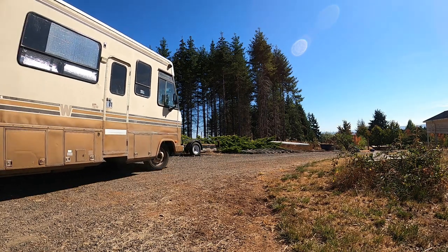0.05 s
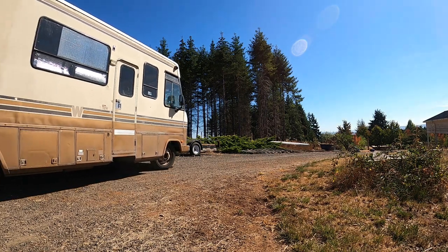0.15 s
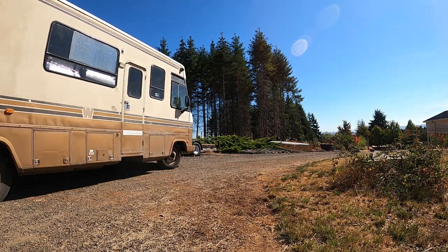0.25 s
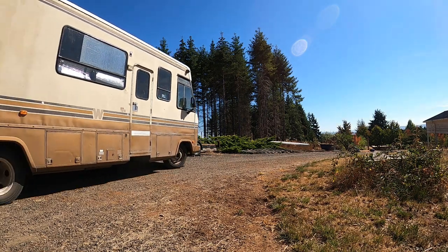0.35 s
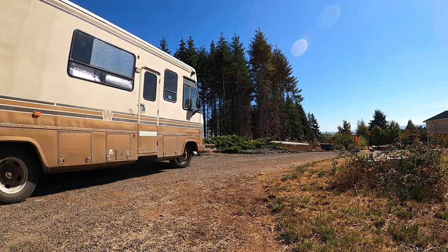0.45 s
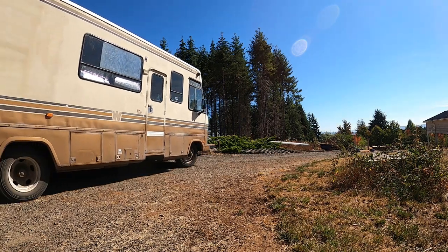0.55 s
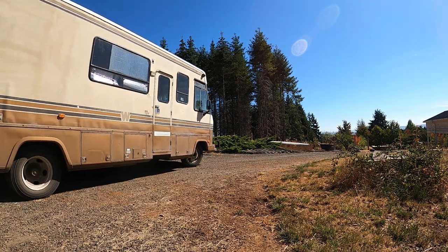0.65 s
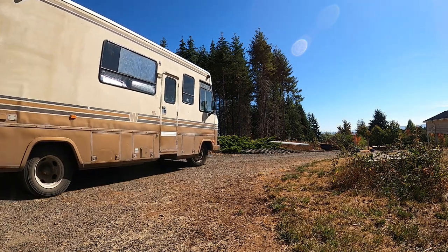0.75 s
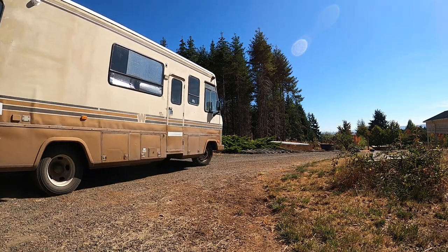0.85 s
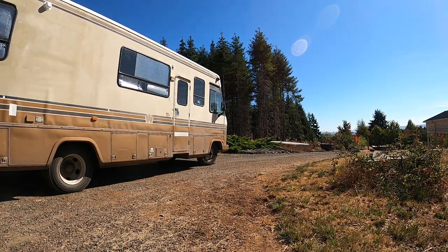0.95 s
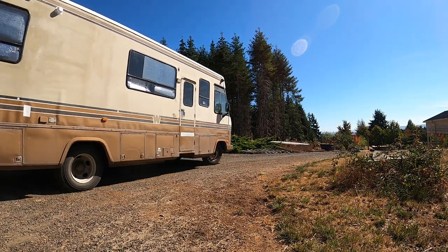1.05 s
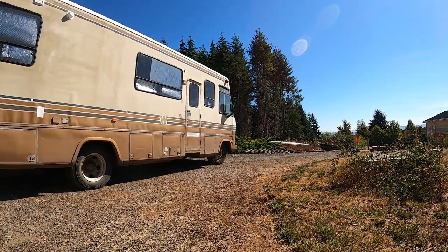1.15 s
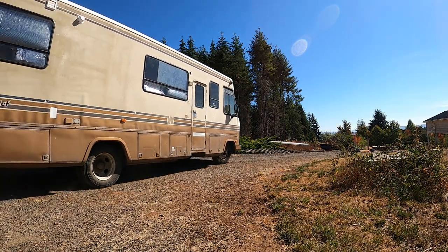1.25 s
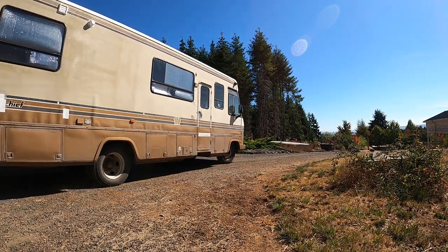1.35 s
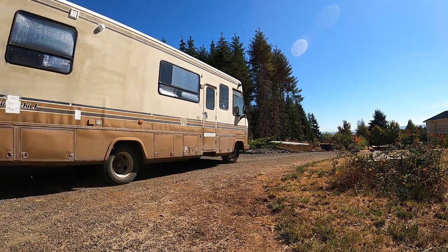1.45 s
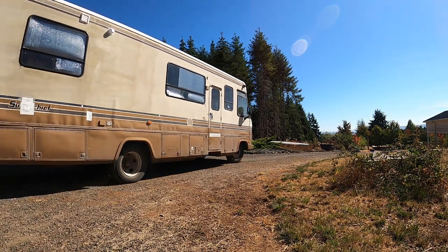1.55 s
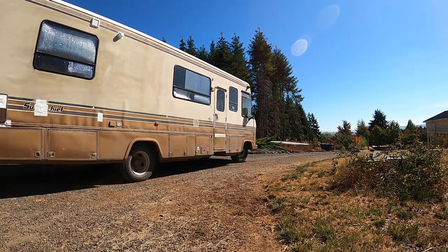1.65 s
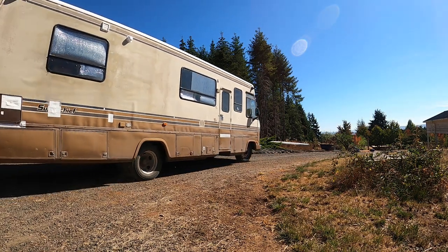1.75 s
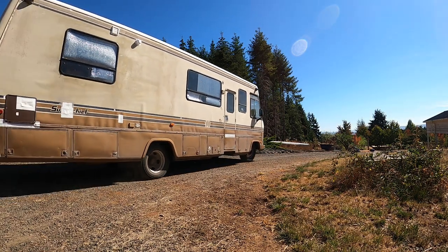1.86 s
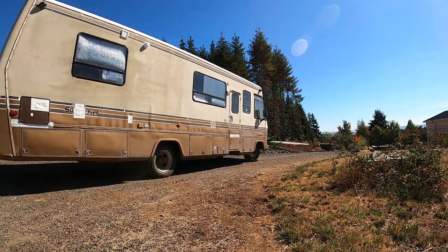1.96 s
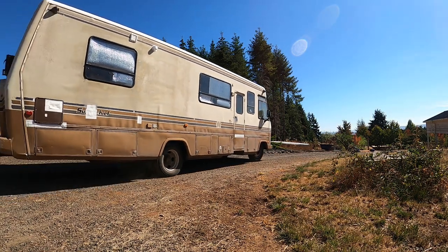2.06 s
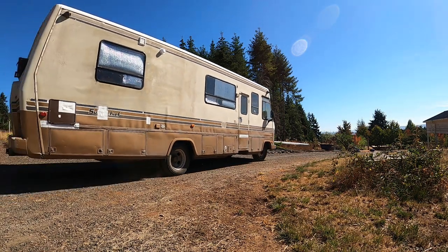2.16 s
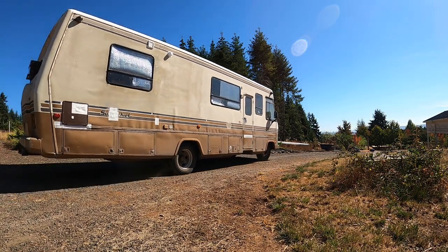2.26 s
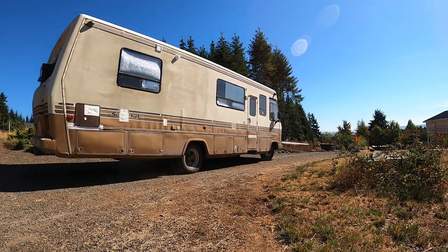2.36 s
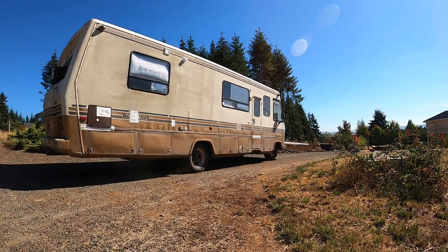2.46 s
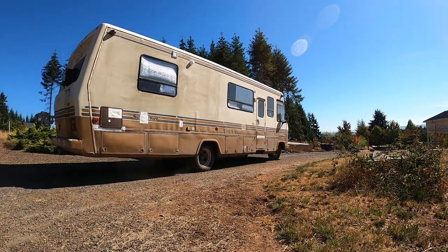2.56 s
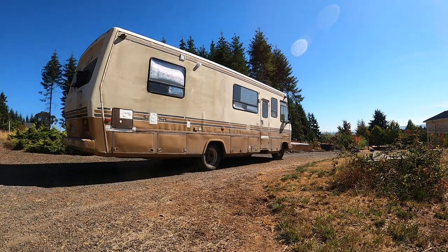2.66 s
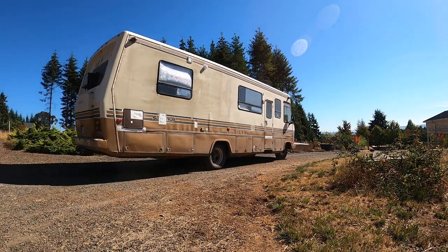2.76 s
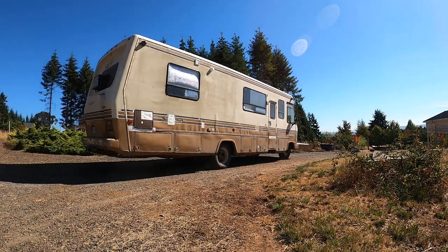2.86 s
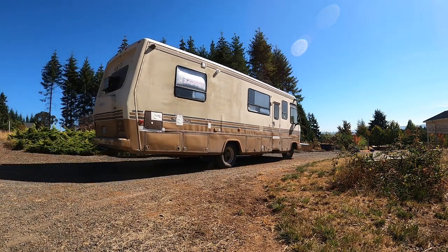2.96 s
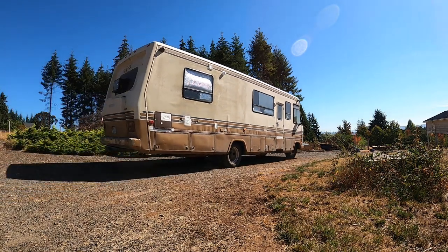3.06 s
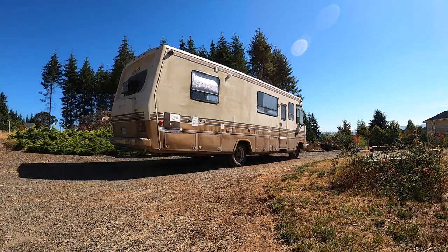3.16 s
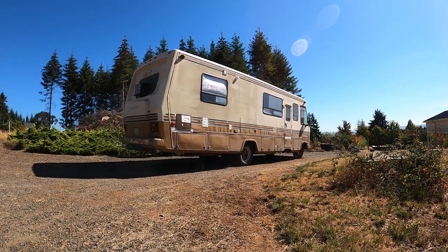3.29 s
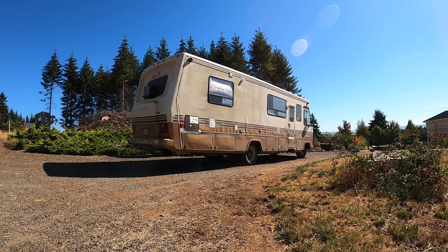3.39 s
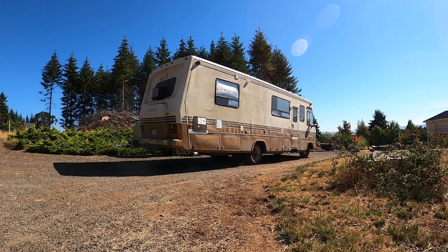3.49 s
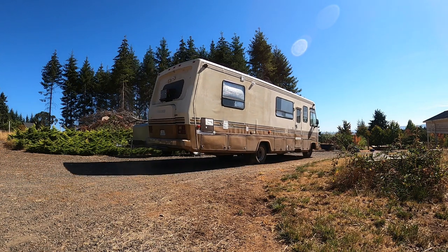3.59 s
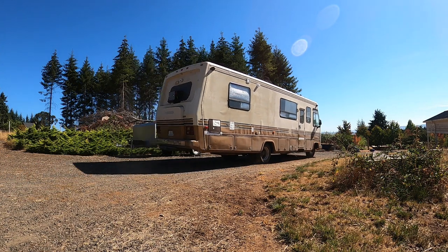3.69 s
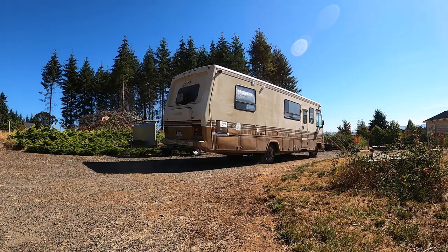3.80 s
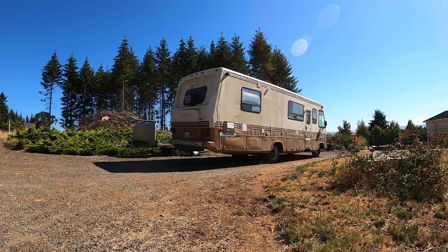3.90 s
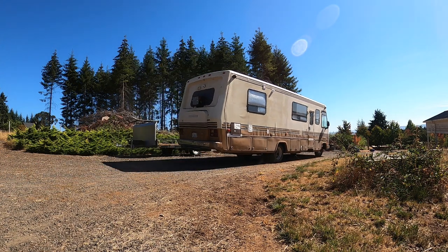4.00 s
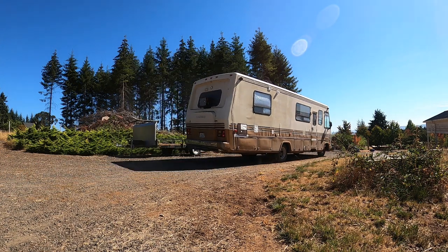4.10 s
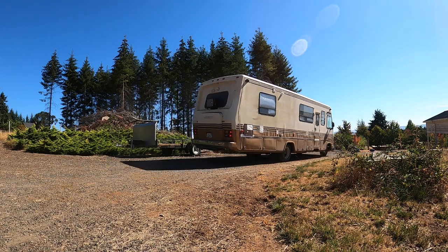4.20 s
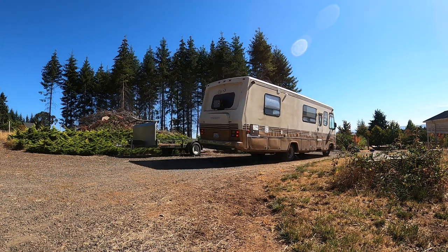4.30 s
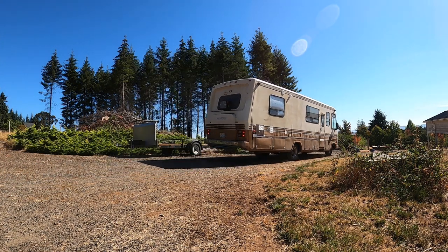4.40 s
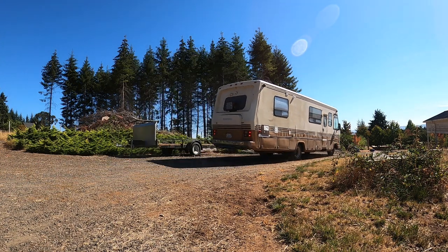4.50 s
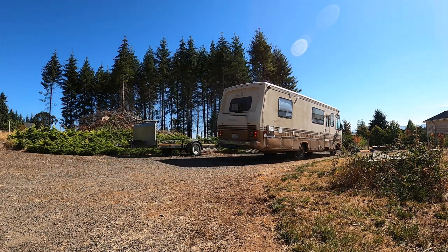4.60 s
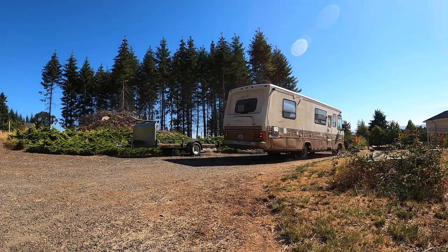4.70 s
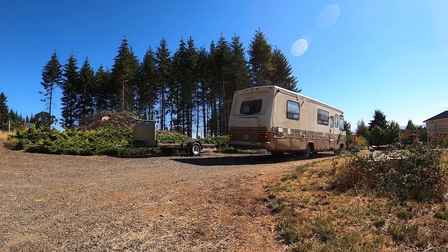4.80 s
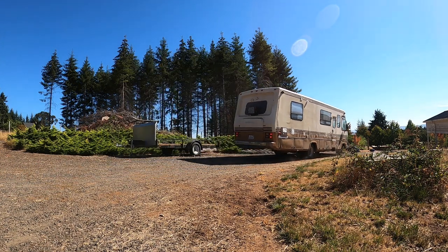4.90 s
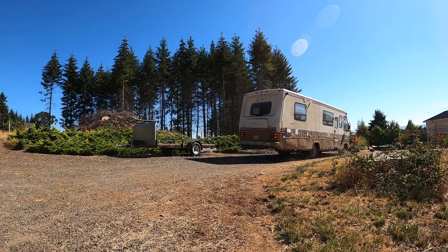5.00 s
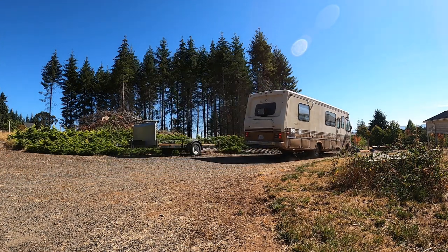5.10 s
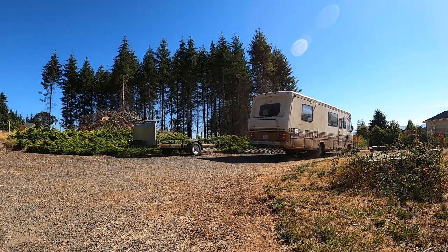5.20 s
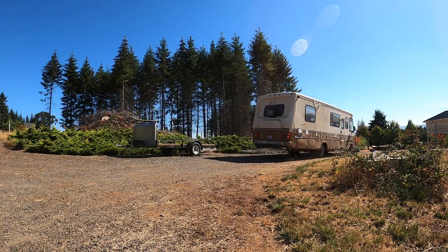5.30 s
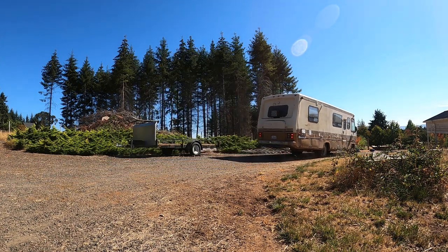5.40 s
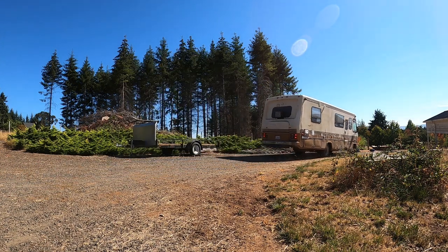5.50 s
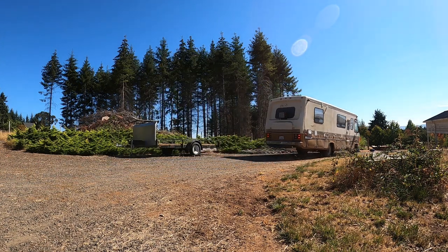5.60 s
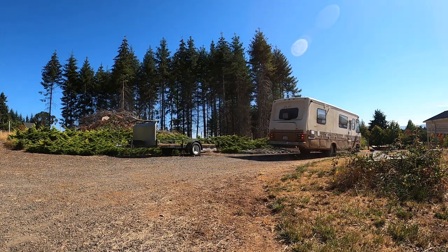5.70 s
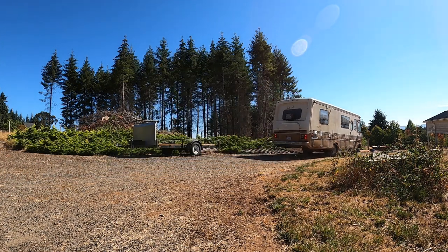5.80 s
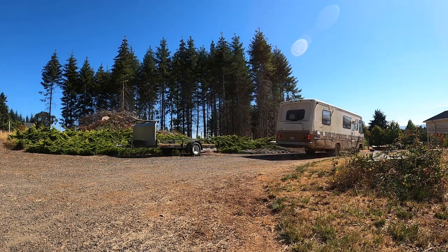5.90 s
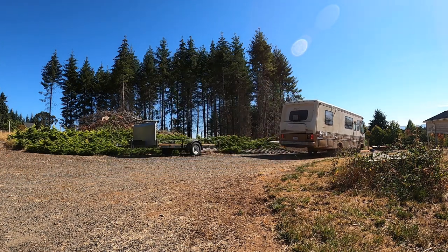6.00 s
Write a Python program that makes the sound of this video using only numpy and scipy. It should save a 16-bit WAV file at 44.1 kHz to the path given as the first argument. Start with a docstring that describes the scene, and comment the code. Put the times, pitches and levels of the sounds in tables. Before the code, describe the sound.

Gravel crackles and single stones pop under the tyres of a motorhome, close and to the left at first. Beneath this, a large engine rumbles with a low, uneven pulse and a steady hum. As the vehicle moves off through the open air toward the centre, the engine softens and the pops thin out. Low gusts of wind thump on the microphone, then settle, leaving a faint rumble and crunch.

```python
"""Motorhome rolling away over gravel

A heavy motorhome idles off in the open air, from the left to just right of centre, fading as it goes.
Its V8 throbs at a hunting idle and puffs through the exhaust pipe, while a steadier motor hums on board.
Stones crunch, pop and snap under the tyres, and gusts buffet the two microphone ports."""
import sys
import numpy as np
from scipy import signal
from scipy.fft import rfft, irfft, next_fast_len
from scipy.io import wavfile
from scipy.ndimage import uniform_filter1d

SR = 44100
rng = np.random.default_rng(int(sys.argv[2]) if len(sys.argv) > 2 else 0)


def transcribe(u):
    """Save the signal u as a 16-bit wav file named by the first command-line argument.

    u: samples, shape (n,) or (channels, n), limited to [-1, 1]; the rate is SR.
    q: integer samples, one column per channel.
    """
    v = np.clip(np.atleast_2d(u).T, -1, 1)
    q = np.round(v * 32767).astype(np.int16)
    wavfile.write(sys.argv[1], SR, q)


N = 266788


def from_db(db):
    """Decibels to gain."""
    return 10 ** (np.asarray(db) / 20)


def rms_one(x):
    """Scale to rms 1."""
    return x / np.sqrt(np.mean(x ** 2) + 1e-20)


def peak_one(x):
    """Scale to peak 1."""
    return x / np.abs(x).max()


def in_time(rows):
    """Automation curves: each column after the time, read at every sample."""
    s, *columns = np.transpose(rows)
    return [np.interp(np.arange(N) / SR, s, column) for column in columns]


def at_hz(points, hz):
    """Read a spectrum on a log-frequency axis."""
    points_hz, values = np.transpose(points)
    return np.interp(np.log(hz), np.log(points_hz), values)


def envelope(s, hold_s, rise_s, fall_s):
    """Rise to 1 at time s, hold, fall."""
    corners_s = np.cumsum([s - rise_s, rise_s, hold_s + 1e-4, fall_s])
    return np.interp(np.arange(N) / SR, corners_s, [0, 1, 1, 0])


def drift(rate_hz):
    """Smooth random modulation of rms 1, changing about rate_hz times a second."""
    hop = 40
    pole = np.exp(-2 * np.pi * rate_hz * hop / SR)
    slow = signal.lfilter([1], [1, -2 * pole, pole * pole], rng.standard_normal(N // hop + 2002))[2000:]
    return np.interp(np.arange(N) / hop, np.arange(len(slow)), rms_one(slow))


def coloured(spectrum, channels=1):
    """Noise with the given spectrum, rms 1."""
    size = next_fast_len(N)
    hz = np.maximum(np.arange(size // 2 + 1) * SR / size, 1)
    gain = from_db(at_hz(spectrum, hz)) * (hz > 8)
    white = rng.standard_normal((channels, size))
    return rms_one(irfft(rfft(white) * gain, size)[:, :N])


def band(x, low_hz, high_hz):
    """Butterworth band-pass."""
    return signal.sosfilt(signal.butter(2, [low_hz, high_hz], "band", fs=SR, output="sos"), x)


def delayed(x, lag_ms):
    """Delay by a steady or moving lag."""
    return np.interp(np.arange(N) - lag_ms * SR / 1000, np.arange(N), x)


def orders(turns, levels):
    """Sines on multiples of a running phase, from (multiple, rms level/dB) pairs."""
    return sum(np.sqrt(2) * from_db(db) * np.sin(2 * np.pi * k * turns) for k, db in levels)


def add_knock(out, s, peak_db, hz, cycles, swell):
    """Mix in a sine burst; its attack (swell) and its 60 dB decay (cycles) are counted in periods."""
    turns = np.arange(int(2 * cycles * SR / hz)) * hz / SR
    attack = (1 - np.exp(-turns / swell)) ** 2
    knock = np.sin(2 * np.pi * turns) * attack * from_db(-60 * turns / cycles)
    start = round(s * SR)
    out[start:start + len(knock)] += from_db(peak_db) * peak_one(knock)[:N - start]


def cracks(per_s, spread_db):
    """Clicks at random moments, most small, a few large; rms 1."""
    sizes = from_db(spread_db * np.minimum(rng.exponential(1, N), 4)) * rng.choice([-1, 1], N)
    return rms_one((rng.random(N) < per_s / SR) * sizes)


def bursts(count, decay_s):
    """Rows of noise that open with a crack and die away with a time constant near decay_s."""
    decays_s = decay_s * from_db(rng.normal(0, 1.6, (count, 1)))
    noise = rng.standard_normal((count, SR // 40))
    noise[:, 0] = 7.0
    return noise * np.exp(-np.arange(SR // 40) / SR / decays_s)


def wind():
    """Gusts hit each microphone port with a lumpy low buffet, a flutter above it and single thumps."""
    # gusts: t/s, hold/s, buffet/dB, flutter/dB, left over right/dB
    gusts = [(0.961, 0.023, -28, -55, 0), (2.202, .25, -49, -53, 0), (2.8, .42, -27, -51, 0),
             (3.343, 0.55, -23, -37.5, -2), (3.995, 0.096, -27.5, -38, -9), (4.17, 0.31, -19.5, -33.5, 0),
             (4.584, 0.086, -19.5, -32.5, 2), (4.724, 0.23, -20.5, -36.5, 5), (5.058, 0.15, -19, -32, 2.5),
             (5.345, 0.029, -32, -54, -7), (5.661, 0.14, -48, -44, 4)]
    # buffet spectrum: f/Hz, density/dB
    buffet_spectrum = [(12, -2.5), (43, 19.5), (100, 10), (160, 6.5), (260, -42.5), (500, -66), (900, -120)]
    # thumps of air: t/s, left peak/dB, right peak/dB
    thumps = [(3.365, -26, -14), (4.170, -15.5, -27), (4.213, -9, -26), (4.243, -17, -9), (4.329, -8, -34),
              (4.35, -3, -9), (4.391, -18, -14), (4.419, -11, -20), (4.448, -12, -12.5), (4.652, -19, -24),
              (4.871, -9, -31), (4.903, -16, -24), (4.937, -10, -24), (5.066, -7, -26), (5.154, -14, -24)]
    calm_buffet_db, calm_flutter_db = -41.5, -58
    shapes = np.array([envelope(s, hold_s, rise_s=0.047, fall_s=0.083) for s, hold_s, *_ in gusts])
    *_, buffet_db, flutter_db, pan_db = np.transpose(gusts)
    sides_db = np.outer([.5, -.5], pan_db)
    buffet_gain = from_db(calm_buffet_db) + from_db(buffet_db + sides_db) @ shapes
    flutter_gain = from_db(calm_flutter_db) + from_db(flutter_db + sides_db) @ shapes
    lumps = from_db(3.9 * np.array([drift(15.0), drift(28.0)]))
    air = rng.standard_normal((2, N)) + 1.1 * rng.standard_normal(N)   # partly common to both ports
    flutter = rms_one(band(band(air, 130, 264), 110, 300) * lumps ** 1.316)
    buffet = rms_one(coloured(buffet_spectrum, channels=2) * lumps)
    out = buffet_gain * buffet + flutter_gain * flutter
    for s, left_db, right_db in thumps:
        add_knock(out[0], s, left_db, hz=98, cycles=3.22, swell=0.58)
        add_knock(out[1], s, right_db, hz=115, cycles=1.7, swell=0.66)
    return out


def motor():
    """The motor on board hums at a near-steady speed, each order wavering in level."""
    # hum: t/s, speed/Hz, second order/dB, third order/dB, upper orders/dB
    hum = [(0, 34.24, -20.5, -34, -30), (.8, 34.06, -25, -32, -41.5), (1.6, 33.97, -23, -32.5, -42.5),
           (2.4, 34.05, -24.5, -25, -38.5), (3.2, 34.15, -32.5, -32.5, -41), (3.6, 34.05, -29, -28.5, -42),
           (4.2, 33.84, -31.5, -26.5, -41.5), (4.8, 34.07, -23.5, -42, -53.5),
           (5.4, 34.21, -38, -35, -52.5), (6.05, 33.7, -46, -32.5, -55.5)]
    # overtones: multiple of the speed, level/dB re upper orders
    overtones = [(4, -6.5), (6, -3.5), (9, -7.5), (10, -10), (12, -11), (13, -7)]
    # eighth order: t/s, level/dB
    eighth = [(0, -48.5), (3.3, -55), (3.45, -40), (3.8, -43.5), (4.1, -45), (4.3, -53), (6.05, -54)]
    speed_hz, second_db, third_db, upper_db = in_time(hum)
    turns = np.cumsum(speed_hz) / SR
    upper = [(k, upper_db + db + 4.0 * drift(0.99)) for k, db in overtones]
    leading = [(2, second_db + .5 * drift(1.4)),
               (3, third_db + 2.0 * drift(8.1)),
               (8, in_time(eighth)[0] + 3.0 * drift(2.8))]
    return orders(turns, leading + upper)


def rolling():
    """Levels in dB of big stones, small stones and grit as the tyres roll and crush heaps of gravel."""
    # steady roll: t/s, big stones/dB, small stones/dB, grit/dB
    roll = [(0, -25, -32.5, -48), (.4, -27.5, -34, -49), (.88, -29, -35.5, -52.5), (1.12, -29, -34, -47),
            (2.1, -32, -34.5, -52), (2.6, -29, -34, -53), (3.0, -30.5, -34.5, -54), (3.3, -34, -37, -55.5),
            (3.6, -31.5, -36, -55.5), (3.85, -35.5, -40, -57.5), (4.5, -35, -39.5, -51.5),
            (4.66, -40, -42, -57), (4.75, -35, -38.5, -53), (4.9, -37, -40, -54), (5.15, -42, -44, -56),
            (6.05, -44.5, -45.5, -57)]
    # crushed heaps: t/s, change in big stones/dB, change in small stones and grit/dB
    crushes = [(.07, 3.5, 1), (.47, -2, 3), (.8, -1, 5.5), (.93, 3.5, 0), (1.27, 2, 2), (1.369, 4.5, -2),
               (1.94, 0, 4), (2.43, 4, 1.5), (2.5, -0.5, 2), (2.7, -4, -2), (2.79, 0.5, 5.5), (2.85, 1, 3),
               (3.408, 3.5, 5), (3.49, 0.5, -1.5), (3.61, 1.5, -0.5), (3.89, 5, 3), (4.25, 3.5, 3.5),
               (4.31, 0.5, 2), (4.47, 7.5, -3), (4.75, -3, -1.5), (4.92, 5.5, -3), (5.73, 9, 4)]
    big_db, small_db, grit_db = in_time(roll)
    shapes = np.array([envelope(s, hold_s=0, rise_s=0.01, fall_s=0.053) for s, *_ in crushes])
    big_change_db, fine_change_db = np.array(crushes)[:, 1:].T @ shapes
    return big_db + big_change_db, small_db + fine_change_db, grit_db + fine_change_db


def crunch(low_db, high_db):
    """Stones crack in clumps over a rolling hiss; low_db and high_db shade the lows and upper mids."""
    # gravel spectrum: f/Hz, density/dB
    gravel_spectrum = [(250, 5.5), (400, 8), (520, 4.5), (720, 5.5), (1100, 8), (1600, -8.5), (2800, -16),
                       (4500, -24.5), (5500, -28.5), (6500, -22.5), (7700, -24), (9000, -47), (11000, -49),
                       (13500, -33.5)]
    # stereo likeness: f/Hz, correlation of left and right
    likeness = [(300, 0.99), (1000, 0.93), (3000, 0.87), (6000, 0.82), (9000, 0.91), (11000, 0.76)]
    hiss, sharpness = 0.62, 0.35
    big_db, small_db, grit_db = rolling()
    clumps = from_db(2.8 * drift(18.0))
    wide_cracks = cracks(per_s=250.0 * clumps ** 2, spread_db=10.5)   # these span the whole range
    edges_hz = 220 * 2 ** np.arange(0, 6.2, 1 / 3)   # third octaves
    crossovers_hz = [450, 1500, 2500, 5800]
    zones = np.zeros((5, 2, N))
    for k, (low_hz, high_hz) in enumerate(zip(edges_hz, edges_hz[1:])):
        hz = np.sqrt(low_hz * high_hz)
        if k % 3 == 0:   # most cracks reach across one octave
            grains = cracks(per_s=2500.0 * (hz / 2000) ** .7 * clumps, spread_db=4.5)
            grains += sharpness * (hz / 4000) ** 0.35 * wide_cracks
            centre = rms_one(grains + hiss * rng.standard_normal(N))
            spread = rng.standard_normal(N) * clumps ** 0.72
        # alternate signs join the bands without gaps
        mid, side = band([centre, spread], low_hz, high_hz) * (-1) ** k
        alike = at_hz(likeness, hz)
        stereo = np.sqrt(1 + alike) * mid + np.sqrt(1 - alike) * side * [[1], [-1]]
        gain = from_db(at_hz(gravel_spectrum, hz) + 1.65 * drift(20.0))
        zones[np.searchsorted(crossovers_hz, hz)] += gain * stereo
    lows, low_mids, mids, high_mids, grit = zones
    big = (from_db(low_db) * lows + low_mids) / np.std(low_mids)
    small = (mids + from_db(high_db) * high_mids) / np.std(mids + high_mids)
    return from_db(big_db) * big + from_db(small_db) * small + from_db(grit_db) * rms_one(grit)


def snaps():
    """Stones snap as noise bursts with a pitched ring and two brighter bands; grit ticks in the treble."""
    # snapping stones: t/s, ring peak/dB, ring f/Hz, middle band/dB re ring, top band/dB re ring
    stone_snaps = [(0.0562, -18.5, 3040, -26, -28), (0.097, -26, 3730.0, -15, -26),
                   (0.1386, -29, 3730.0, -42, -53), (0.2102, -12.5, 3930, -9, -20),
                   (0.2742, -26, 4000, 1, -9), (0.2924, -33, 3060.0, -27, -38),
                   (0.3143, -18, 1700.0, -29, -48), (0.336, -16, 1700.0, -38, -33),
                   (0.354, -22, 4110.0, -26, -54), (0.4671, -16, 1700.0, -20, -59),
                   (0.46, -21, 4300, -12, -25), (0.5174, -23.5, 3730.0, -9, -18),
                   (0.5591, -27, 1880.0, -37, -40), (0.5708, -16, 1880.0, -9, -56),
                   (0.638, -17, 1871, -23, -46), (0.7667, -18, 1880.0, -47, -55),
                   (0.804, -18, 4110.0, -17, -31), (1.0171, -21, 3380.0, -31, -41),
                   (1.087, -22, 3380.0, -14, -30), (1.1373, -32, 4530.0, -22, -47),
                   (1.1553, -19, 4110.0, -17, -23), (1.2663, -17, 3600, -21, -50),
                   (1.2694, -15.5, 2300, -12, -56), (1.272, -19, 2400, -20, -50),
                   (1.3261, -20, 5000.0, -3, -20), (1.3599, -27, 1680, -47, -60),
                   (1.432, -23, 4110.0, -15, -37), (1.5099, -18.5, 4095, -27, -33),
                   (1.5704, -23, 4110.0, -5, -30), (1.6475, -35, 2280.0, -42, -53),
                   (1.6871, -28, 1880.0, -35, -42), (1.8173, -23, 4550, -12, -13),
                   (1.8248, -22, 5000.0, -4, -23), (1.8994, -25, 1700.0, -40, -53),
                   (2.0549, -27, 3058, -37, -50), (2.2886, -19, 4330, -22, -55),
                   (2.2925, -18, 4200, -20, -55), (2.292, -18, 2200, -36, -55),
                   (2.2984, -29, 4400, -15, -52), (2.342, -27, 4500, -15, -39),
                   (2.3516, -31, 3380.0, -24, -55), (2.4102, -20.5, 4300, -15, -41),
                   (2.4323, -11.5, 2400, -45, -53), (2.4464, -21, 3060.0, -23, -46),
                   (2.4893, -16, 4107, -20, -55), (2.5385, -19, 2078, -41, -51),
                   (2.5651, -22, 2280.0, -27, -53), (2.5965, -20.5, 2070.0, -39, -36),
                   (2.7434, -18, 2050, -37, -54), (2.7901, -34, 4500, -14, -41),
                   (2.9049, -27, 2280.0, -21, -44), (2.9244, -22, 2500, -31, -38),
                   (2.962, -18, 2501, -40, -37), (3.27, -29, 4600, -18, -41),
                   (3.3444, -18.5, 5000.0, -11, -21), (3.3943, -25, 5000.0, -12, -53),
                   (3.4116, -22, 3380.0, -26, -42), (3.461, -23, 2780.0, -33, -57),
                   (3.497, -18.5, 4110.0, -2.5, -13), (3.571, -29, 4600, -14, -42),
                   (3.634, -32, 2400, -25, -48), (3.901, -32, 1900, -30, -48), (4.113, -26, 4500, -14, -36),
                   (3.5937, -17, 1700.0, -40, -43), (4.1489, -26, 2900, -31, -49),
                   (4.2198, -29, 1700.0, -31, -50), (4.249, -22, 3060.0, -26, -56),
                   (4.3029, -24, 2100, -37, -41), (4.3724, -23.5, 3078, -34, -47),
                   (4.556, -24, 2780.0, -17, -52), (4.585, -27, 3060.0, -38, -50),
                   (4.688, -27, 2780.0, -14, -51), (5.3191, -25, 4110.0, -14, -33),
                   (5.32, -26, 1900, -40, -48), (5.555, -27, 2800, -21, -45), (5.7353, -29, 2073, -27, -59),
                   (5.9434, -23.5, 4530.0, -18, -46), (6.007, -26, 4500, -10, -40)]
    # middle and top band of a snap: low edge/Hz, high edge/Hz
    bright_bands = [(5000, 7300), (7600, 10500)]
    # grit ticks: t/s, peak/dB
    ticks = [(.1181, -41), (.1874, -44), (.377, -36), (.3994, -36), (.511, -32), (.585, -41), (.61, -42),
             (.9244, -47), (1.4433, -41), (1.6273, -31), (1.9335, -31), (1.966, -28), (2.174, -31),
             (2.4981, -28), (2.5164, -37), (2.5401, -33), (2.5865, -35), (2.6459, -29), (2.893, -32),
             (3.234, -49), (3.485, -40), (3.6371, -45)]
    tick_hz = (6000, 11000)
    out = np.zeros(N + SR)
    snap_bursts = bursts(len(stone_snaps), decay_s=0.0015)
    for (s, peak_db, hz, middle_db, top_db), burst in zip(stone_snaps, snap_bursts):
        middle, top = [peak_one(band(burst, *edges_hz)) for edges_hz in bright_bands]
        ring_hz = (hz / 1.73, hz * 1.31)
        ring = peak_one(band(band(burst, *ring_hz), *ring_hz))
        snap = ring + from_db(middle_db) * middle + from_db(top_db) * top
        out[round(s * SR):][:len(snap)] += from_db(peak_db) * snap
    for (s, peak_db), burst in zip(ticks, bursts(len(ticks), decay_s=0.0013)):
        tick = peak_one(band(band(burst, *tick_hz), *tick_hz))
        out[round(s * SR):][:len(tick)] += from_db(peak_db) * tick
    return out[:N]


def pops():
    """A stone pops out from under a tyre, then knocks its neighbours twice, softer each time."""
    # popping stones: t/s, peak/dB, f/Hz
    stone_pops = [(0.055, -9, 700), (0.134, -16, 667), (0.175, -15, 716), (0.354, -11.5, 690),
                  (0.468, -11, 930), (0.56, -13, 700), (0.698, -22, 1090), (0.733, -13, 795),
                  (0.821, -8.5, 765), (0.956, -5, 990), (1.323, -14, 740), (1.359, -16, 705),
                  (1.361, -10.5, 1330), (1.549, -14, 918.4), (1.613, -9.5, 775), (2.005, -11.5, 1307),
                  (2.055, -23, 803), (2.352, -14.5, 976), (2.431, -14.5, 716), (2.536, -16, 983),
                  (2.629, -14, 555), (2.697, -8.5, 818), (2.792, -13.5, 968.5), (3.633, -12.5, 897.5),
                  (3.877, -17.5, 648), (3.901, -14.5, 801), (4.074, -13.5, 845), (4.222, -19, 898),
                  (4.304, -18, 900), (4.511, -17, 1164), (4.556, -19.5, 916), (5.066, -22, 290),
                  (5.319, -25, 1100), (5.54, -21, 753), (5.734, -22, 957.5)]
    settle_s, settle_db = .006, -7
    out = np.zeros(N)
    for s, peak_db, hz in stone_pops:
        add_knock(out, s, peak_db, hz, cycles=7.4, swell=0.068)
        for bounce, cycles in [(1, 5.5), (2, 5.0)]:
            timing, detune = rng.uniform(.6, 1.6, 2)
            bounce_s = s + bounce * settle_s * timing
            add_knock(out, bounce_s, peak_db + bounce * settle_db, hz * detune, cycles, swell=0.2)
    return out


def body_thuds():
    """The body booms over a bump."""
    # thuds: t/s, peak/dB, f/Hz
    thuds = [(0.062, -14, 382), (0.073, -16, 323), (5.536, -31, 475)]
    out = np.zeros(N)
    for s, peak_db, hz in thuds:
        add_knock(out, s, peak_db, hz, cycles=20.0, swell=2.0)
    return out


def treble_dip(x, dip_hz, depth_db=-8.0, width_hz=900.0):
    """A reflection near the microphone cancels a band that slides as the bearing changes."""
    block = 512
    radius = np.exp(-np.pi * width_hz / SR)
    resonance, state = np.zeros_like(x), np.zeros((2, 2))
    for i in range(0, N, block):
        poles = [1, -2 * radius * np.cos(2 * np.pi * dip_hz[i] / SR), radius ** 2]
        resonance[:, i:i + block], state = signal.lfilter([1, 0, -1], poles, x[:, i:i + block], zi=state)
    return x - (1 - from_db(depth_db)) * (1 - radius ** 2) / 2 * resonance


def exhaust(turns):
    """Turbulence swells with each firing and blows the pipe's resonances."""
    # pipe resonances: f/Hz, width/Hz, level/dB
    resonances = [(201.3, 29.6, -6.5), (410, 36, -14.5)]
    # strength of the puffs: t/s, level/dB
    puff_levels = [(0.0, -22), (2.75, -26.5), (3.77, -38), (4.3, -39.5), (4.77, -31.5), (5.11, -35.5),
                   (5.44, -48), (6.05, -52)]
    puffs = rng.standard_normal(N) * (1 + 0.42 * np.cos(2 * np.pi * turns))
    pipe = np.zeros(N)
    for hz, width_hz, db in resonances:
        low_hz, high_hz = hz - width_hz / 2, hz + width_hz / 2
        ring = band(puffs, low_hz, high_hz)
        pipe += from_db(db) * rms_one(band(ring, low_hz / 2, high_hz * 2))
    return from_db(in_time(puff_levels)[0]) * pipe


def engine():
    """The V8 hunts at idle: a throb of clean low orders over body rumble and rough exhaust puffs."""
    # hunting idle: t/s, firing rate/Hz, first order/dB
    idle = [(0, 38.26, -9.5), (.2, 38.8, -10.5), (.38, 36.73, -14.5), (.58, 39, -11), (.75, 37.9, -14),
            (1.02, 39.51, -9.5), (1.3, 39.7, -11), (1.68, 37.88, -15.5), (1.88, 39.98, -11),
            (2.12, 39.14, -12.5), (2.45, 38.74, -17), (2.78, 38.83, -17.5), (2.95, 39.2, -14.5),
            (3.17, 38.45, -20.5), (3.3, 39.68, -14.5), (3.48, 38.2, -19.5), (3.8, 40.75, -16.5),
            (4.15, 39.12, -20), (4.5, 37.8, -23), (4.72, 39.49, -17.5), (4.88, 38.07, -24.5),
            (5.12, 39.78, -17), (5.4, 39.53, -20), (6.05, 39.77, -22)]
    # third order when right on the boom: t/s, level/dB
    boom_levels = [(0, -19), (.5, -20.5), (.9, -20.5), (1.15, -20.5), (1.5, -21), (1.9, -21), (2.3, -21.5),
                   (2.9, -19.5), (3.55, -23), (3.9, -20.5), (4.3, -31.5), (5.1, -32), (6.05, -25)]
    # weak orders: multiple of the firing rate, level/dB re smoothed first order
    weak_orders = [(.5, -33), (2, -19.5), (2.5, -24.5), (4, -29.5), (5, -29), (5.5, -35.5)]
    # body rumble: f/Hz, density/dB
    rumble_spectrum = [(12, 5.5), (22, 12.5), (50, 11), (90, 4), (130, -1), (300, -4), (500, -48.5),
                       (900, -110)]
    boom_hz, boom_half_width_hz = 114.75, 3.46   # the third order peaks as the idle sags onto this boom
    rumble_db = -14.5   # re smoothed first order
    firing_hz, first_db = in_time(idle)
    off_boom = (3 * firing_hz - boom_hz) / boom_half_width_hz
    third_db = in_time(boom_levels)[0] - 10 * np.log10(1 + off_boom ** 4)
    turns = np.cumsum(firing_hz) / SR
    uneven_db = np.interp(turns, np.arange(300), rng.standard_normal(300))   # each firing varies by ~1 dB
    pipe = exhaust(turns)
    rumble = from_db(rumble_db) * coloured(rumble_spectrum)[0]
    weak = orders(turns, weak_orders) * from_db(2.0 * drift(3.1) + uneven_db)
    load_db = uniform_filter1d(first_db, size=SR // 2)
    loose_turns = turns + 0.03 * drift(8.5)   # the pulses come a little early or late
    first = orders(turns, [(1, first_db + drift(35.0))])
    third = orders(loose_turns, [(3, third_db + 1.1 * drift(3.3) + 0.8 * uneven_db)])
    return first + third + from_db(load_db) * (rumble + weak) + pipe


def scene():
    """The tyres move across the stereo field; the bass stays nearly centred, with the wind on top."""
    # path from the tyres: t/s, left over right/dB, left lag/ms, treble dip/Hz,
    # crunch under 450 Hz/dB, crunch from 2.5 to 5.8 kHz/dB
    bearing = [(0, 9, 0.004, 5800, 2.5, 2), (.5, 5, 0.027, 5640, 0.5, 1.5),
               (1.5, 2.5, 0.01, 5800, -1.5, 1.5), (2.5, 0.6, 0.021, 6040, -1, 0.5),
               (3.5, -0.5, 0.024, 6650, 2, 2), (4.5, -1, 0.042, 6900, -9, 5.5),
               (6.05, -2, 0.047, 6696, -1, 6.5)]
    bass_pan_db = 1.23   # left over right
    pan_db, lag_ms, dip_hz, low_db, high_db = in_time(bearing)
    gravel = crunch(low_db, high_db) + snaps() + pops() + body_thuds()
    left, right = treble_dip(gravel, dip_hz)
    pan = from_db([pan_db / 2, -pan_db / 2])
    tyres = np.array([delayed(left, lag_ms), right]) * pan / pan.mean(axis=0)
    bass = (engine() + motor()) * from_db([[bass_pan_db / 2], [-bass_pan_db / 2]])
    bass[1] = delayed(bass[1], lag_ms=0.074)
    return bass + tyres + wind()


def record(dry):
    """The microphone ports soften the treble; peaks are rounded and the very top is cut."""
    edge_hz, treble_db, cutoff_hz = 6700, -4, 15700
    below = signal.sosfilt(signal.butter(8, edge_hz, fs=SR, output="sos"), dry)
    above = signal.sosfilt(signal.butter(8, edge_hz, "high", fs=SR, output="sos"), dry)
    softened = below + from_db(treble_db) * above
    rounded = 2.0 * np.tanh(softened / 2.0)
    return signal.sosfilt(signal.cheby2(12, 70, cutoff_hz, fs=SR, output="sos"), rounded)


dry = scene()
out = record(dry)
transcribe(out)
```